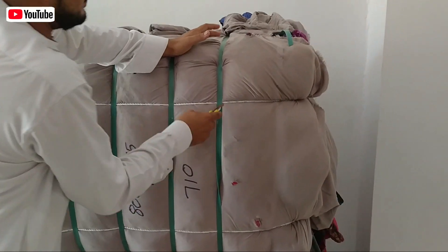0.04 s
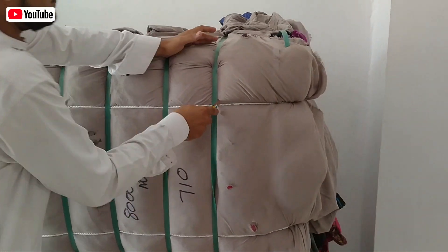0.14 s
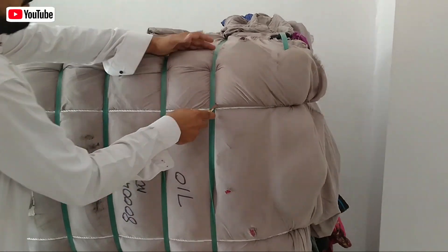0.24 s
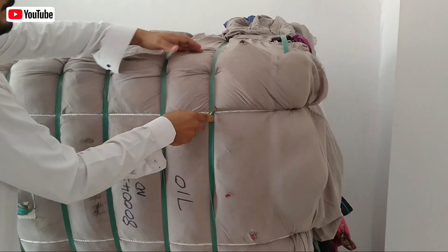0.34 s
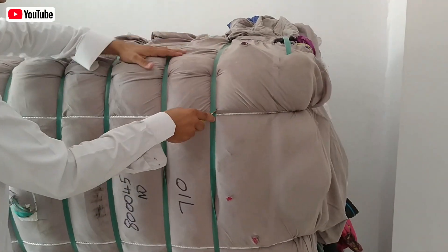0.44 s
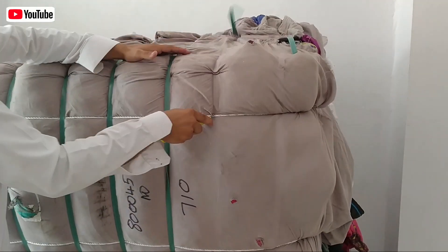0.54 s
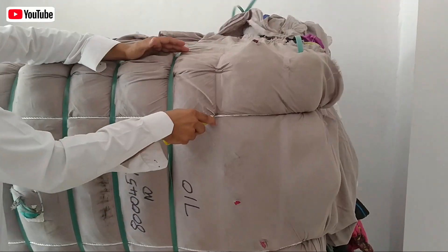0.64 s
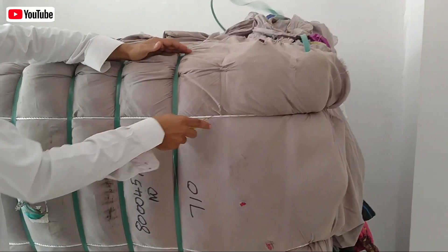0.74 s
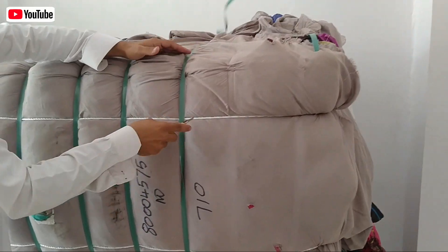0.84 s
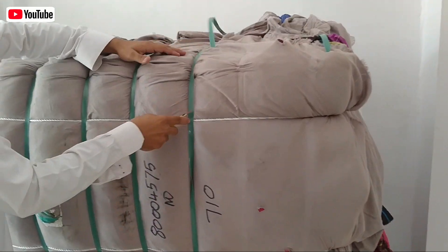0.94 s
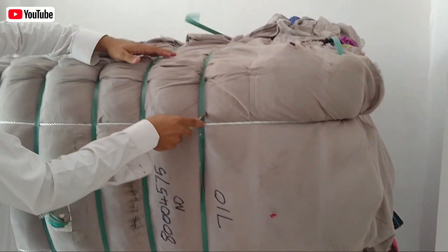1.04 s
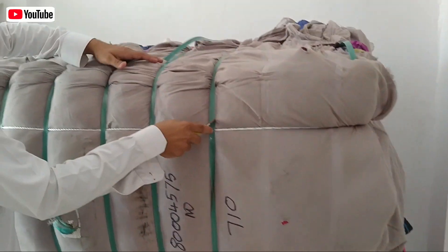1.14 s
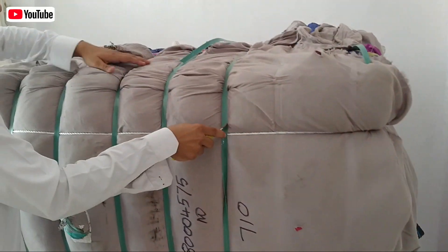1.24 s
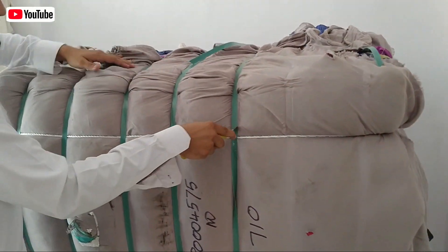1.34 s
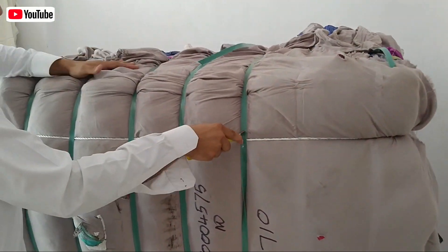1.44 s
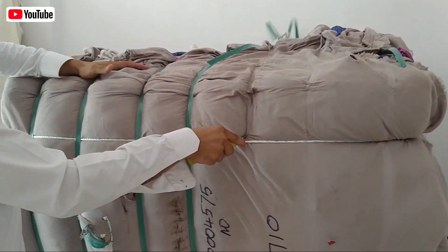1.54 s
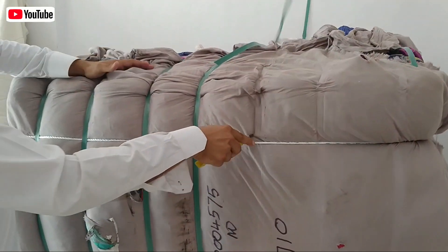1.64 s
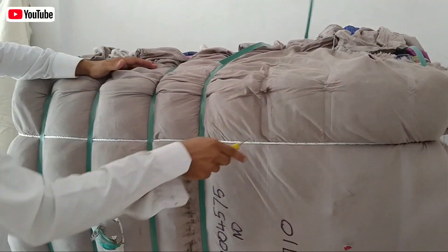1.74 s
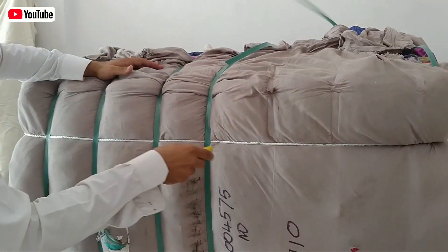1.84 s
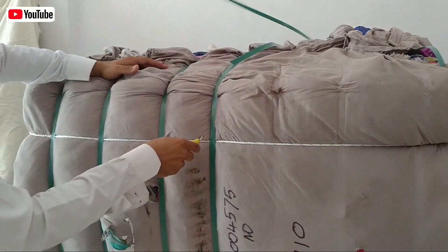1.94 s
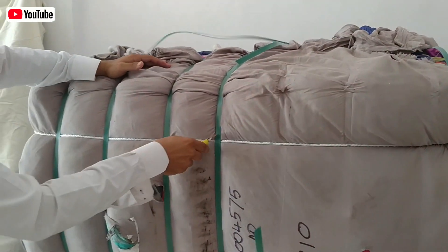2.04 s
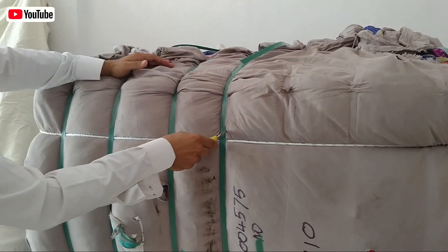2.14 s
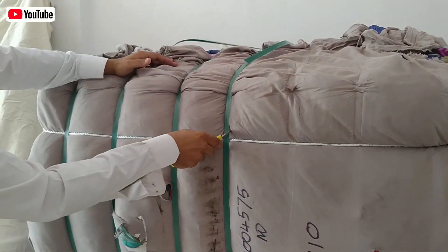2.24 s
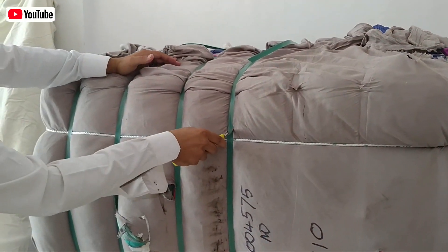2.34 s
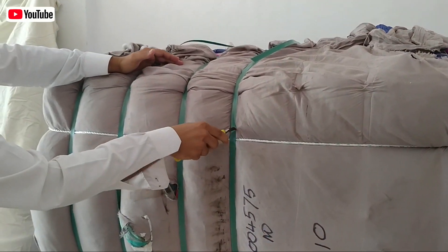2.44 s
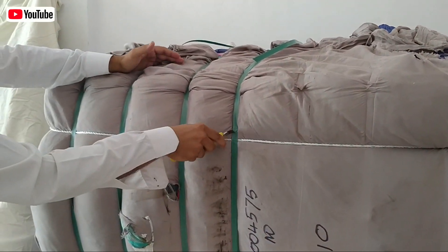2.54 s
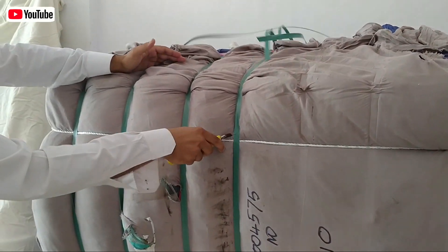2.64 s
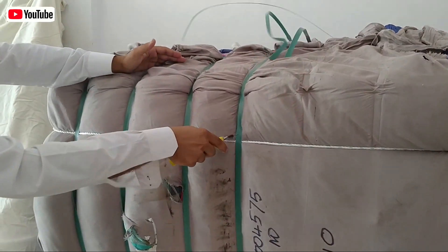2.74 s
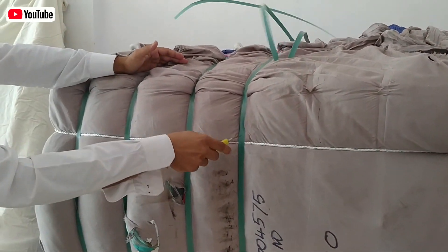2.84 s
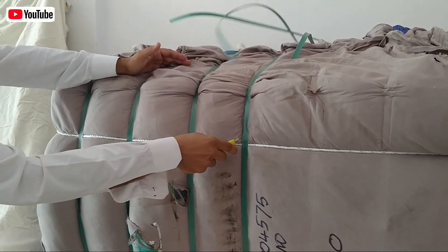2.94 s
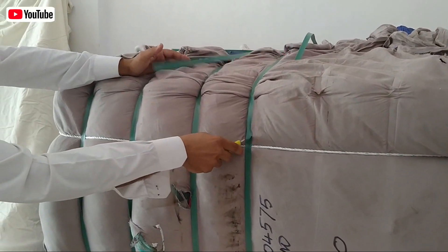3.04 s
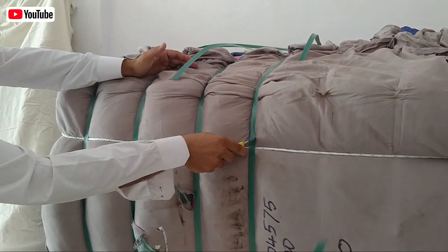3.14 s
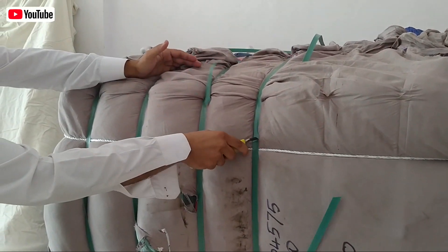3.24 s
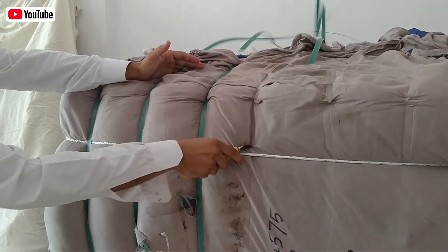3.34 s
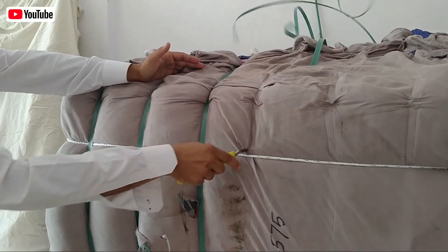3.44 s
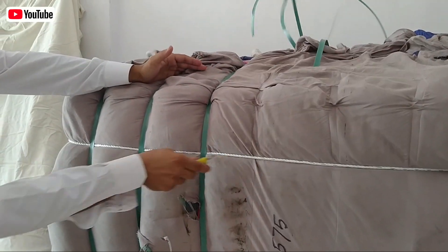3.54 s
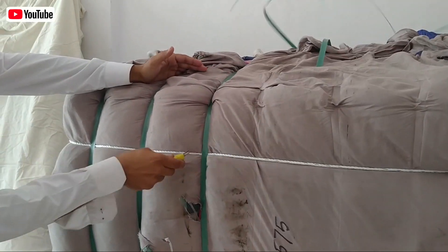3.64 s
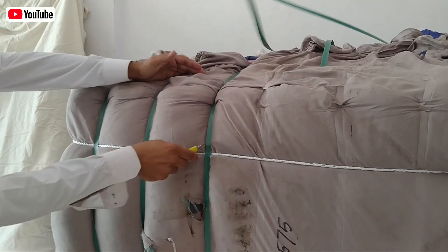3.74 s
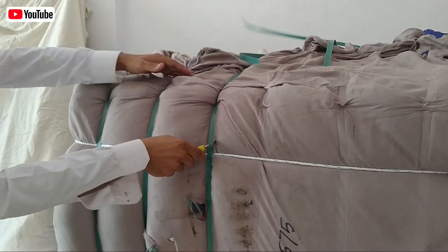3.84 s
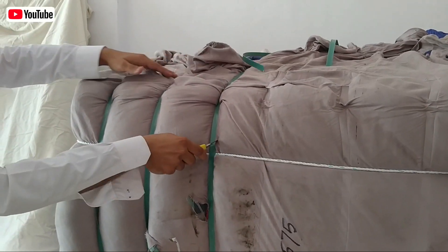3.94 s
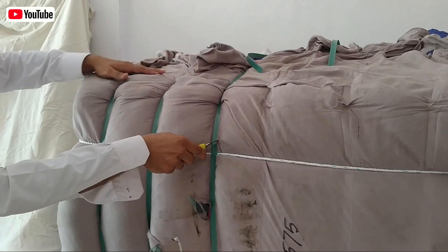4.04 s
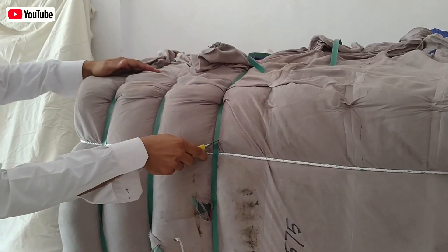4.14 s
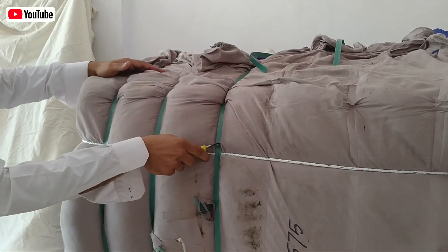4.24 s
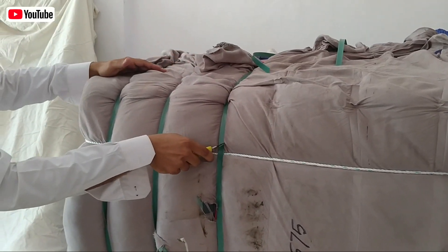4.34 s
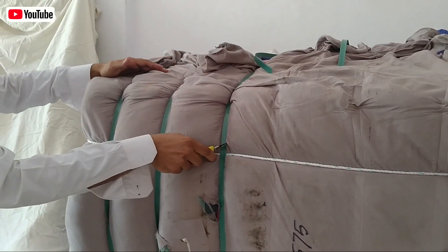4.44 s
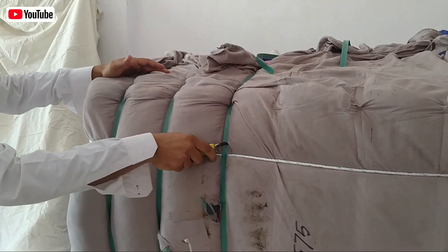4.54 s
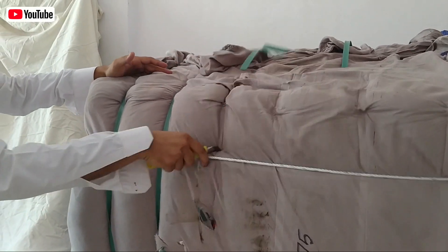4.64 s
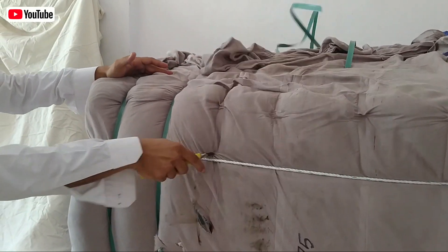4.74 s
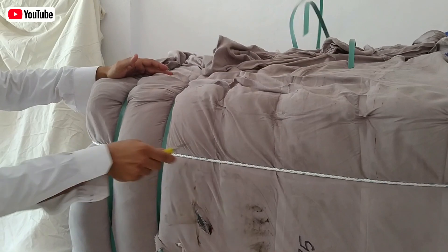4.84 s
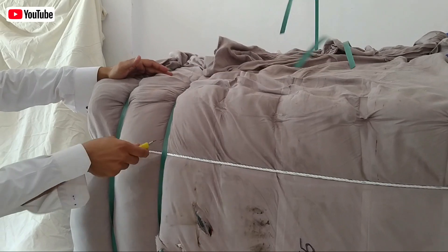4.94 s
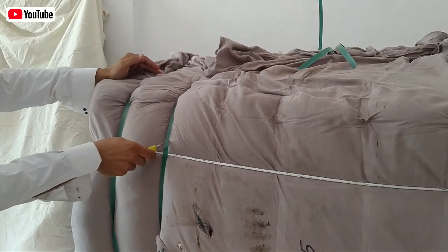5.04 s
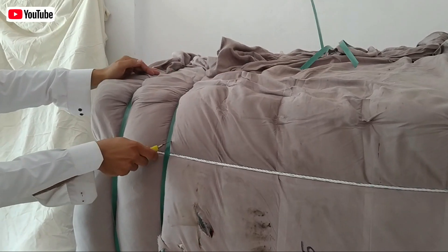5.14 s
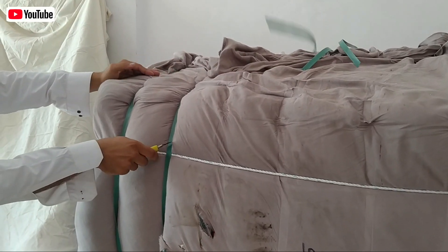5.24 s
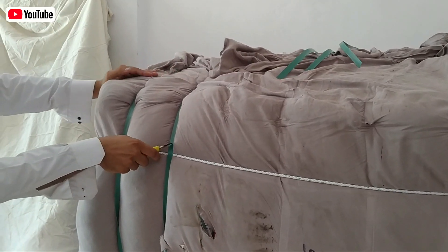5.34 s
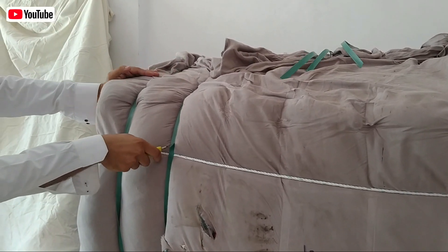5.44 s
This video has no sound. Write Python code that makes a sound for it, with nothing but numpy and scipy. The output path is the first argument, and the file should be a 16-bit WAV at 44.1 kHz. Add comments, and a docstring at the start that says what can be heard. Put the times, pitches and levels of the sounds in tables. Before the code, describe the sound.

An echo is already dying as the sound begins. Five strap snaps follow at uneven intervals, sharp and clacky, with the bale thumping outward, strap ends slapping and soft cloth hissing afterwards. The hard room answers with a smeared wall reflection and half-second tail. Light blade knocks and scrapes come mostly late. Muffled motor rumble passes outside; the phone recorder squashes the loud cracks and dulls the highest treble.

```python
"""In a bare, echoing room, a utility knife cuts the tight plastic straps of a pressed clothing bale.
Each strap frays, parts in two cracks and lashes about; bursts of tiny clicks make its resonances ring.
The bale thumps outward, the cloth hisses, and the room answers with fading noise and booming low tones.
The knife also knocks and scrapes lightly. Behind it lie hiss, rumble, hum and a motor passing far outside.
The phone's limiter flattens the loud snaps."""
import sys
import numpy as np
from scipy import signal
from scipy.fft import rfft, irfft
from scipy.io import wavfile
from scipy.ndimage import uniform_filter1d, minimum_filter1d

SR = 44100
rng = np.random.default_rng(int(sys.argv[2]) if len(sys.argv) > 2 else 0)


def log_audio(samples):
    """Write samples as a 16-bit WAV file to the path given in sys.argv[1]."""
    # one column per channel
    frames = np.atleast_2d(samples).T
    # limit to full scale, then quantise
    limited = np.clip(frames, -1, 1)
    pcm = np.round(limited * 32767).astype(np.int16)
    wavfile.write(sys.argv[1], SR, pcm)


N = 242550
TIME = np.arange(N) / SR
AGE = np.arange(SR) / SR  # one second, counted from a blow
TOP_HZ = 7600  # the phone cuts everything above this


def undb(db):
    """Turn decibels into a gain."""
    return 10 ** (np.asarray(db) / 20)


def level(x, db):
    """Scale a sound to an rms level in dB."""
    return x * undb(db) / np.sqrt(np.mean(x ** 2))


def read(points, hz):
    """Read an (Hz, value) table with straight lines on a log-frequency axis."""
    table_hz, value = np.transpose(points)
    return np.interp(np.log(np.maximum(hz, 1)), np.log(table_hz), value)


def noise(points, size):
    """Noise of rms 1, coloured by a table of (frequency [Hz], level [dB])."""
    hz = np.fft.rfftfreq(size, 1 / SR)
    spectrum = rfft(rng.standard_normal(size)) * undb(read(points, hz))
    return level(irfft(spectrum, size), 0)


def walk(rate):
    """Slow chance: a random level every 1 / rate seconds, joined by ramps, with a spread near 1."""
    hold = int(SR / rate)
    steps = np.repeat(rng.standard_normal(N // hold + 1), hold)
    return level(uniform_filter1d(steps, hold)[:N], 0)


def add(out, s, sound):
    """Mix a sound in at a time in seconds, which may lie before the start."""
    start = int(round(s * SR))
    part = sound[max(-start, 0):N - start]
    out[max(start, 0):max(start, 0) + len(part)] += part


def ring(push, modes, edge_hz=6400):
    """Damped resonances answer a push with alternating sign; the soft contact loses the top octave."""
    out = 0
    for k, (hz, width, db) in enumerate(modes):
        resonance = signal.lfilter(*signal.iirpeak(hz, hz / width, fs=SR), push)
        out = out + (-1) ** k * undb(db) * resonance
    soft = signal.butter(N=8, Wn=min(edge_hz, TOP_HZ), fs=SR, output="sos")
    return signal.sosfilt(soft, out)


def clicks(rate):
    """One second of sparse clicks of uneven size, about `rate` of them."""
    return (rng.random(SR) < rate / SR) * rng.standard_normal(SR)


def split(decay_s):
    """Tiny releases packed into a burst that dies within milliseconds, like fibres giving way."""
    return rng.choice([-1, 1], SR) * np.exp(-AGE / decay_s)


# Even hiss of the quiet room, its colour: (frequency [Hz], level per Hz [dB])
HISS_COLOUR = [(290, -49.5), (500, -14.5), (529, -19.5), (620, -1), (752, -4.5), (871, -2.5), (943, -2.5),
               (1120, -3), (1480, -1.5), (1740, 0), (2340, 0.5), (3100, -7.5), (5280, -0.5), (6190, -6.5),
               (7510, -42.5), (9760, -66), (16500, -120)]
# Low rumble, its colour: (frequency [Hz], level per Hz [dB])
RUMBLE_COLOUR = [(40, -39.5), (70, -13), (110, 7), (180, 0), (300, 0), (450, -4.5), (600, -7.5),
                 (900, -37.5)]
# Tones of the machine hum: (frequency [Hz], level [dB], unsteadiness [share of the pitch])
HUM_TONES = [(175, -64.5, .012), (261, -64.5, 0.014), (360, -62.5, 0.012), (404, -60.5, 0.0021)]


def quiet_room(hiss_db=-49, rumble_db=-56, waver_db=2):
    """Coloured noise makes even hiss and rumble; tones of wavering pitch and level make a machine hum."""
    hum = 0
    for hz, db, drift in HUM_TONES:
        phase = 2 * np.pi * np.cumsum(hz * (1 + drift * walk(50))) / SR
        hum = hum + level(np.sin(phase) * undb(waver_db * walk(6.7)), db)
    hiss = undb(hiss_db) * noise(HISS_COLOUR, N)
    rumble = undb(rumble_db) * noise(RUMBLE_COLOUR, N)
    return hiss + rumble + hum


# The distant motor pulling through its gears: (start [s], firing rate [Hz], rise [Hz per s])
MOTOR_GEARS = [(0, 100.2, 19), (2.72, 121.4, 6)]
SHIFT_S = 0.29  # time its revs take to fall at a gear change
MOTOR_NEAREST_S, MOTOR_DB = 3.2, -43  # when it is nearest, and its level then
MOTOR_PASS_S = 0.57  # time it takes to travel as far as its nearest distance from the house
MOTOR_FALL_DB = -34  # change for ten times the distance, screened by buildings


def motor(second_db=-4, third_db=-15, wander=0.0138, flutter_db=5.0, rumble_db=-3):
    """A motor passes outside, changing up once; walls let in only its three lowest orders and rumble."""
    hz = np.zeros(N)
    for s, start_hz, rise in MOTOR_GEARS:
        hz = np.where(TIME >= max(s, 0), start_hz + rise * (TIME - s), hz)
    hz = uniform_filter1d(hz, int(SHIFT_S * SR))
    phase = 2 * np.pi * np.cumsum(hz * (1 + wander * walk(40))) / SR
    orders = 0
    for k, order_db in enumerate([0, second_db, third_db], 1):
        orders = orders + undb(order_db + flutter_db * walk(22)) * np.sin(k * phase)
    sound = level(orders, 0) + undb(rumble_db) * noise(RUMBLE_COLOUR, N)
    distance = np.hypot(1, (TIME - MOTOR_NEAREST_S) / MOTOR_PASS_S)  # 1 at its nearest
    return level(sound, MOTOR_DB) * undb(MOTOR_FALL_DB * np.log10(distance))


# Colour of the room's echo: (frequency [Hz], level per Hz [dB])
ECHO_COLOUR = [(50, -33), (80, -14.5), (115, 6), (200, 1.5), (350, 1.5), (700, -2.5), (1100, -3),
               (1650, -6.5), (2450, -4), (3200, -14), (4400, -15.5), (5650, -8), (6400, -19.5),
               (7600, -58.5)]
# How long the echo takes to fall by 60 dB: (frequency [Hz], decay time [s])
ECHO_DECAY = [(100, 0.67), (250, 0.55), (600, 0.57), (1500, 0.51), (2500, 0.48), (4000, 0.43), (6500, 0.33)]


def echo(bass_db, middle_db, treble_db, sustain_s, wall_s, length=1, early_db=-6, early_dull_db=-4,
         step=0.49, build_s=0.058, clump_db=1.52):
    """Scattered echo: weak and dull until the far wall answers, then swelling; the treble dies first."""
    hz = np.fft.rfftfreq(SR, 1 / SR)
    tone_db = read([(200, bass_db), (750, middle_db), (1900, 0), (5000, treble_db)], hz)
    spectrum = rfft(noise(ECHO_COLOUR, SR)) * undb(tone_db)
    centres = np.array(ECHO_DECAY)[:, 0]
    swell = 1 - (1 - min(step, 1)) * np.exp(-np.abs(AGE - wall_s) / build_s)
    # the decay starts gently while the source still moves
    fading_s = np.hypot(AGE, sustain_s) - sustain_s
    tail = 0
    # each row of the identity matrix picks out one overlapping band
    for share, (centre, t60) in zip(np.eye(len(centres)), ECHO_DECAY):
        band = irfft(spectrum * read(np.c_[centres, share], hz), SR)
        early = undb(early_db + early_dull_db * np.sqrt(centre / 2000))
        onset = np.where(AGE < wall_s, early, swell)
        clumps = undb(clump_db * walk(66)[:SR])  # reflections arrive in bunches
        decay = np.exp(-np.log(1000) * fading_s / (t60 * length))
        tail = tail + band * onset * clumps * decay
    return tail


# Standing waves of the room: (frequency [Hz], relative level [dB], time to fall by 60 dB [s])
STANDING_WAVES = [(121.9, -19.5, 0.23), (139.5, -44, 0.85), (179.5, -36, 0.99), (236.5, -35.5, 0.72),
                  (276.8, -34, 0.72), (311, -37, 0.52)]


def boom(build_s=0.022, scatter_db=-0.5):
    """The bale's thump feeds fading low tones, the room's standing waves, a little differently each time."""
    out = 0
    for hz, db, t60 in STANDING_WAVES:
        tone = np.sin(2 * np.pi * (hz * AGE + rng.random()))
        wave = tone * undb(db + scatter_db * rng.standard_normal())
        out = out + wave * np.exp(-np.log(1000) * AGE / t60)
    return out * (1 - np.exp(-(AGE / build_s) ** 2))


def settling(rustle_db=-51, settle_s=1.0, flicker_db=1):
    """After each cut the cloth swells and slack strap slides over it: a soft hiss that rises and fades."""
    motion = np.zeros(N)
    for s, *_ in STRAP_SNAPS:
        add(motion, s, np.exp(-AGE / settle_s) * np.sin(np.pi * AGE))
    return motion * undb(rustle_db + flicker_db * walk(11)) * noise(HISS_COLOUR, N)


# Light contacts of blade and loose strap: (time [s], relative level [dB])
KNIFE_TICKS = [(.208, -13.5), (3.724, -8), (4.4162, -1.5)]
# Knife handle as the blade catches: (frequency [Hz], width [Hz], relative level [dB])
KNIFE_HANDLE = [(860, 560, 2.5), (1630, 590, 1)]
# The thin blade as it slips free: (frequency [Hz], width [Hz], relative level [dB])
THIN_BLADE = [(2000, 1600, -8), (3030, 190, 5.5), (5600, 1300, -12)]


def knife(knock_db=-1, slip_s=0.0023, scrape_db=-17, scrape_s=0.0042, room_db=-41, wall_s=0.011):
    """The blade catches with a dull knock, slips and rings, and the room answers faintly."""
    out = np.zeros(N)
    for s, db in KNIFE_TICKS:
        knock = ring(signal.unit_impulse(SR), KNIFE_HANDLE, edge_hz=3400)
        add(out, s, undb(knock_db + db) * knock)
        add(out, s + slip_s, undb(scrape_db + db) * ring(split(scrape_s), THIN_BLADE))
        answer = echo(bass_db=-7, middle_db=-6.5, treble_db=9.5, sustain_s=0.028, wall_s=wall_s, length=0.64)
        add(out, s, undb(room_db + db) * answer)
    return out


FLIGHT_S = .041  # a cut end flies this long before it slaps the bale
BOUNCE_S, BOUNCE_DB = .014, -3  # scale of the random time between bounces, and the change at each


def slaps(slap_db=-1, smear_s=0.0011, snap_db=5, edge_hz=6100, count=3):
    """A flying strap end hits the bale and bounces: the strap's clack plus its bright top resonance."""
    out = np.zeros(N)
    for s, *_ in STRAP_SNAPS:
        lands = s + FLIGHT_S
        for bounce in range(count):
            push = undb(BOUNCE_DB * bounce) * split(smear_s)
            add(out, lands, undb(slap_db) * ring(push, STRAP_TONES[:-1], edge_hz))
            add(out, lands, undb(snap_db) * ring(push, STRAP_TONES[-1:], edge_hz))
            lands += BOUNCE_S * rng.uniform(0.39, 2.5)
    return out


# Straps parting, all levels relative: (time [s], first crack [dB], second crack [dB], thump [dB],
# wall echo delay [s], room [dB], room bass [dB], room middle [dB], room treble [dB],
# time the strap keeps moving [s])
STRAP_SNAPS = [(-.19, -3, -4, 0, .021, 0.5, -2.5, 0.5, -3.5, 0.036),
               (0.7329, -3, -7, 3, .021, .5, -1, 0, -1.5, 0.1),
               (1.7111, -4, -5.5, 4, 0.023, .7, 2.5, 1.5, 1.5, .094),
               (2.7680, -1.5, -8, -3.5, 0.022, 1, -3.5, -4, 4, 0.053),
               (3.4726, -2, -1, -2.5, .0225, 2.5, -.5, -3.5, 0.5, 0.077),
               (4.8240, -2.5, -8.5, -3.5, .026, 2.5, 0, -4, -1, 0.086)]
# Resonances of the strap as it cracks: (frequency [Hz], width [Hz], relative level [dB])
STRAP_TONES = [(730, 294, -5), (1330, 440, -2), (1945, 364, 1), (2790, 690, -7.5), (4500, 1100, -13.5),
               (5770, 430, -10)]
# The pressed cloth springing outward: (frequency [Hz], width [Hz], relative level [dB])
BALE_TONES = [(187, 99, 3.5), (733, 79, 6.5)]
SECOND_CRACK_S = .0048  # the last fibres hold this much longer


def straps(crack_db=8, splinter_s=0.0023, thump_db=26, wall_db=-1.5, wall_smear_s=0.0028, room_db=-14.0,
           boom_db=7.7, lash_db=5, lash_s=0.055, fray_db=-11, fray_s=0.01, soft_hz=6250):
    """A strap frays and parts in two cracks, the bale bulges and the free ends lash over the cloth."""
    out = np.zeros(N)
    for (s, first_db, second_db, bulge_db, wall_s,
         echo_db, bass_db, middle_db, treble_db, moving_s) in STRAP_SNAPS:
        # the fraying swells over the last few hundredths of a second before parting
        fraying = clicks(2200) * np.exp((AGE - 1) / fray_s)
        add(out, s - 1, undb(fray_db) * ring(fraying, STRAP_TONES))
        for start, db in [(s, first_db), (s + SECOND_CRACK_S, second_db)]:
            add(out, start, undb(crack_db + db) * ring(split(splinter_s), STRAP_TONES))
            thump = ring(signal.unit_impulse(SR), BALE_TONES)
            add(out, start, undb(thump_db + bulge_db + db) * thump)
        # the crack comes back smeared from the far wall
        add(out, s + wall_s, undb(wall_db) * ring(split(wall_smear_s), STRAP_TONES, soft_hz))
        # the lashing is strongest lash_s after it begins
        lashing = clicks(260) * (AGE / lash_s) ** 2 * np.exp(2 - 2 * AGE / lash_s)
        add(out, s + wall_s, undb(lash_db + treble_db) * ring(lashing, STRAP_TONES, soft_hz))
        add(out, s, undb(room_db + echo_db) * echo(bass_db, middle_db, treble_db, moving_s, wall_s))
        add(out, s, undb(boom_db + echo_db + bass_db) * boom())
    return out


def scene():
    """Background, motor, cloth, knife and straps at one microphone."""
    return (quiet_room() + motor() + settling() + knife() + slaps() + straps())[None]


def limit(x, ceiling_db=-7, release_db_per_s=260):
    """Look-ahead limiter: the gain drops just before a peak and recovers at a steady rate."""
    over_db = np.maximum(20 * np.log10(np.abs(x) + 1e-9) - ceiling_db, 0)
    recovery = release_db_per_s * TIME
    gain_db = recovery - np.maximum.accumulate(over_db + recovery)
    early_db = minimum_filter1d(gain_db, size=45)  # about 1 ms wide
    return x * undb(uniform_filter1d(early_db, size=45))


def record(dry):
    """The phone thins the deep bass, limits the peaks and cuts the top."""
    bass_cut = signal.butter(N=3, Wn=75, btype="high", fs=SR, output="sos")
    thinned = signal.sosfilt(bass_cut, dry[0])
    top_cut = signal.ellip(10, .2, 70, TOP_HZ, fs=SR, output="sos")
    return signal.sosfilt(top_cut, limit(thinned))[None]


dry = scene()
out = record(dry)
log_audio(out)
```